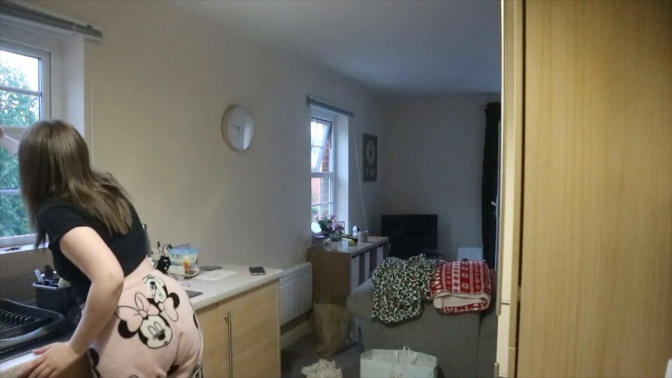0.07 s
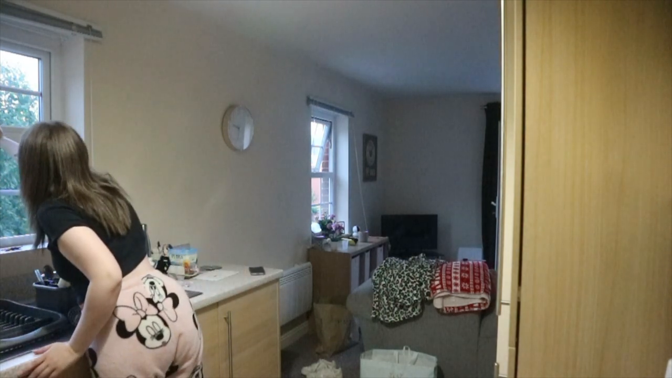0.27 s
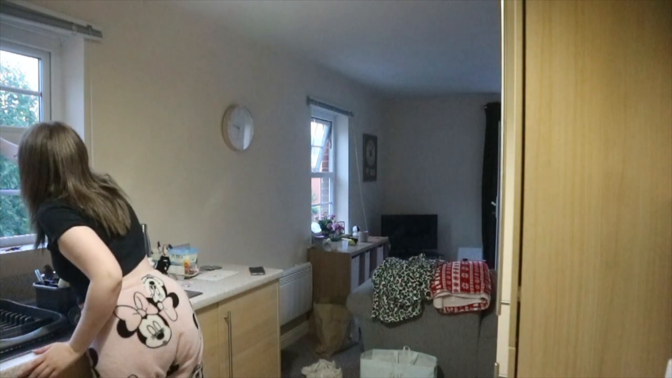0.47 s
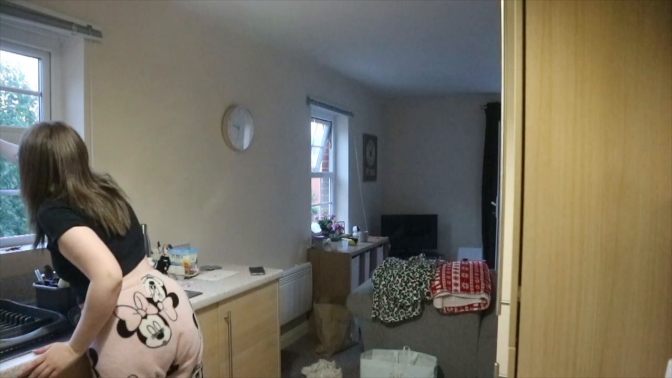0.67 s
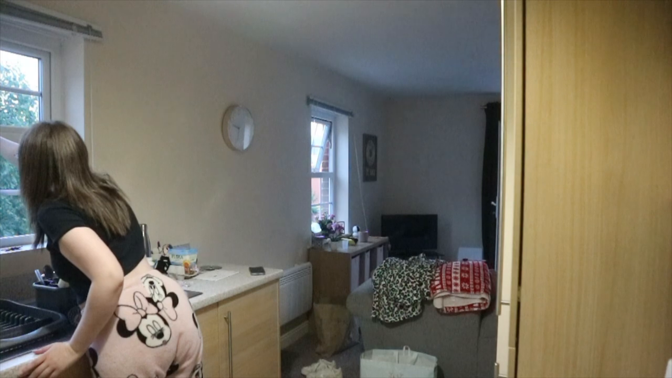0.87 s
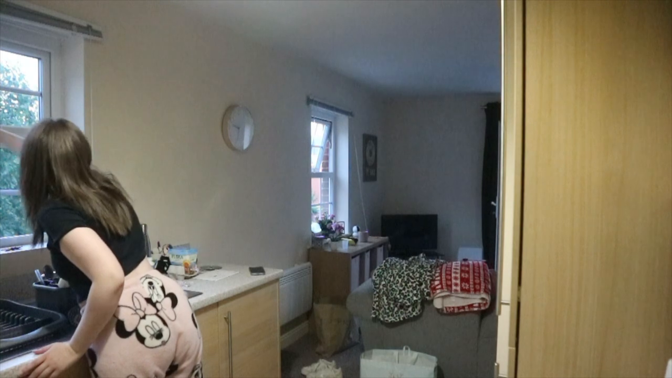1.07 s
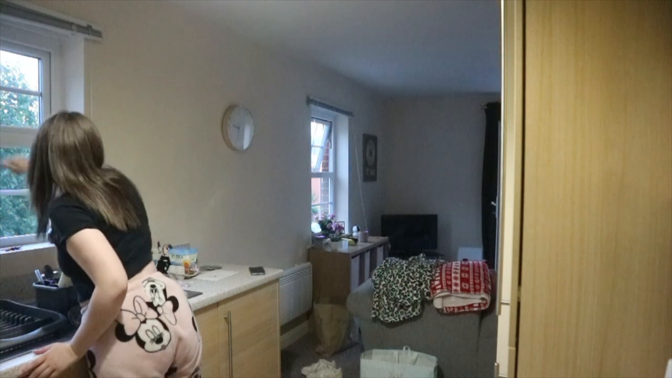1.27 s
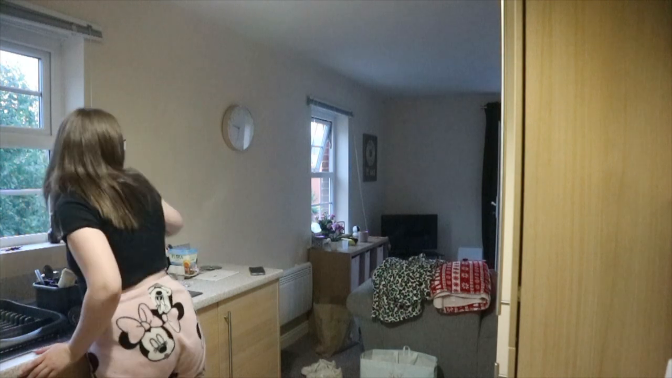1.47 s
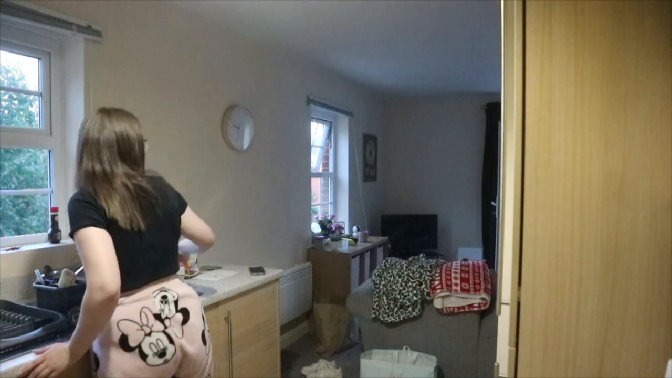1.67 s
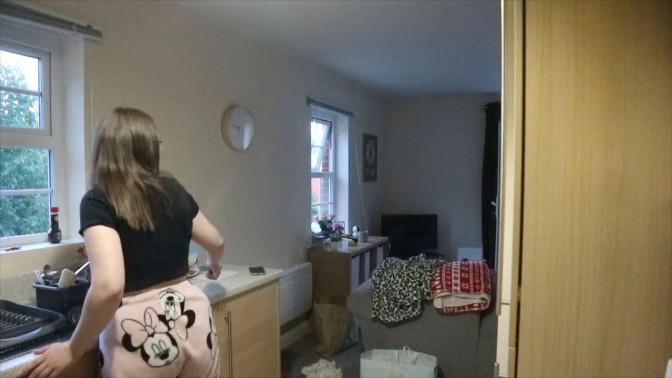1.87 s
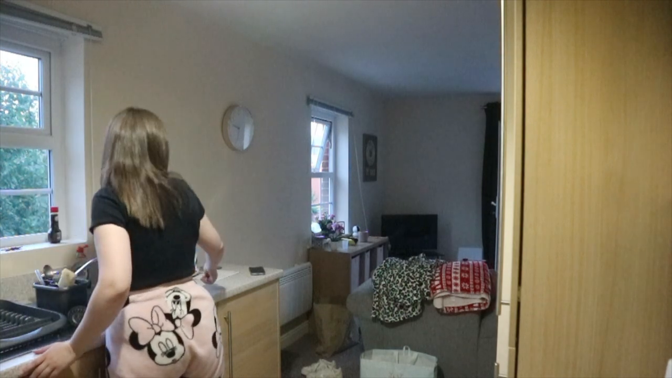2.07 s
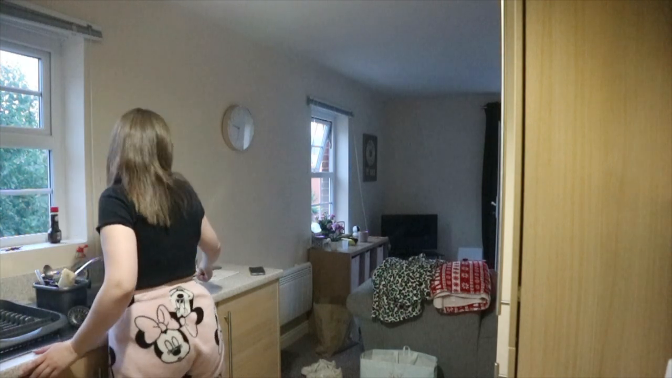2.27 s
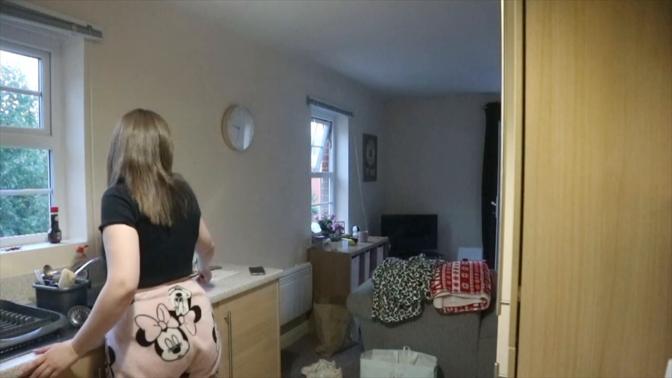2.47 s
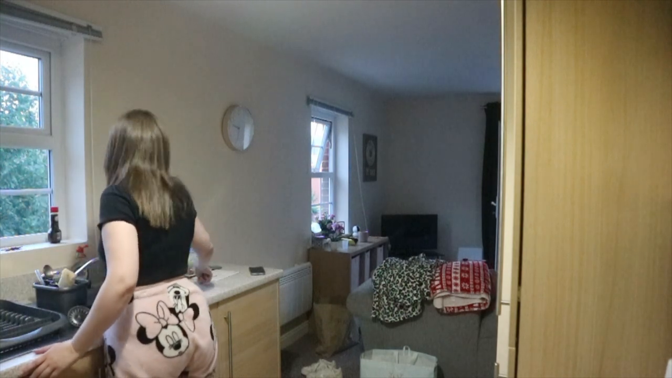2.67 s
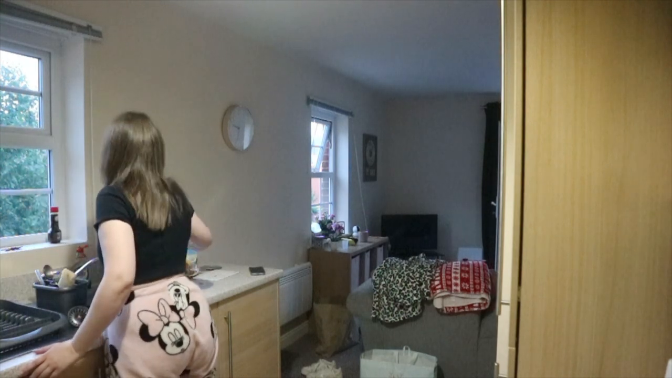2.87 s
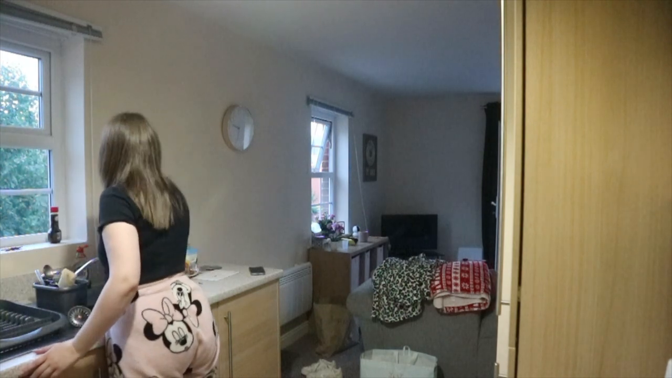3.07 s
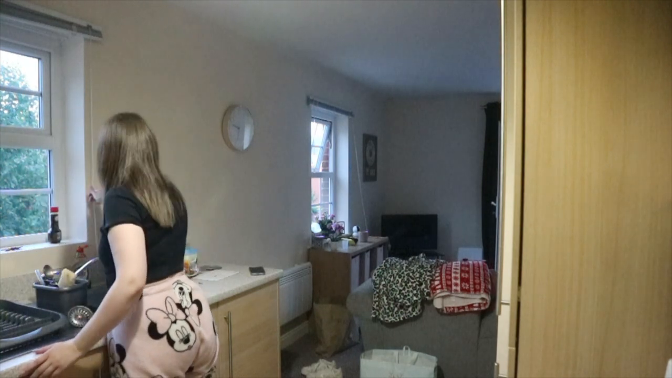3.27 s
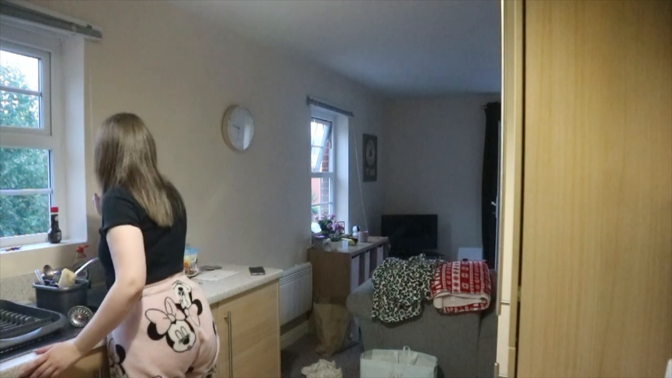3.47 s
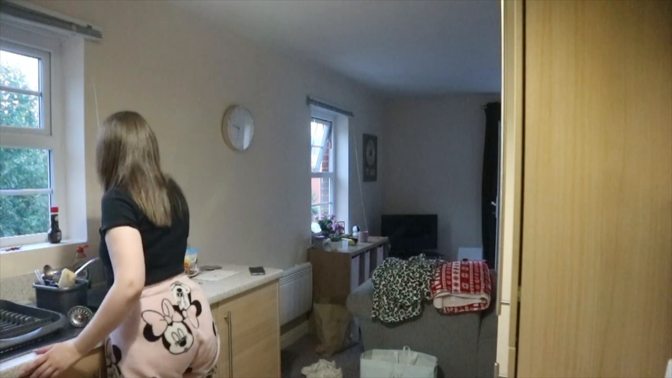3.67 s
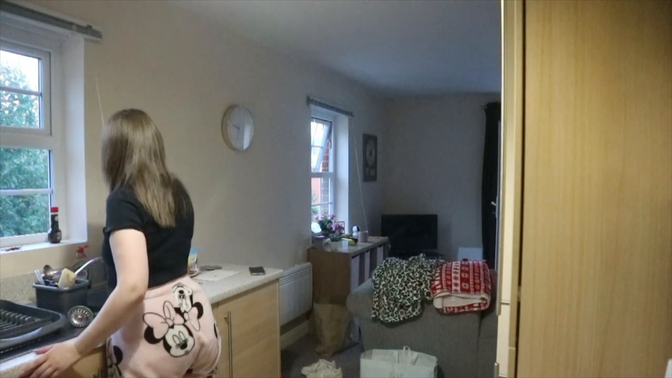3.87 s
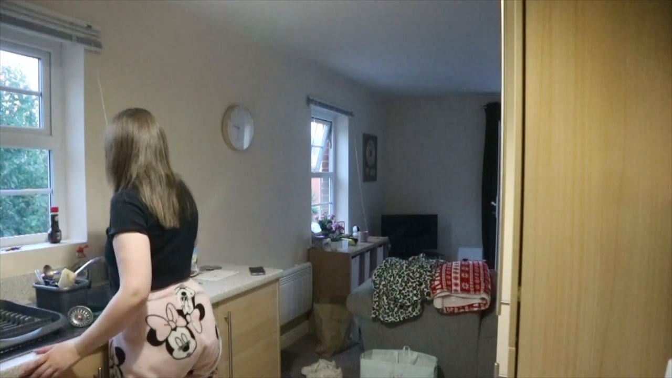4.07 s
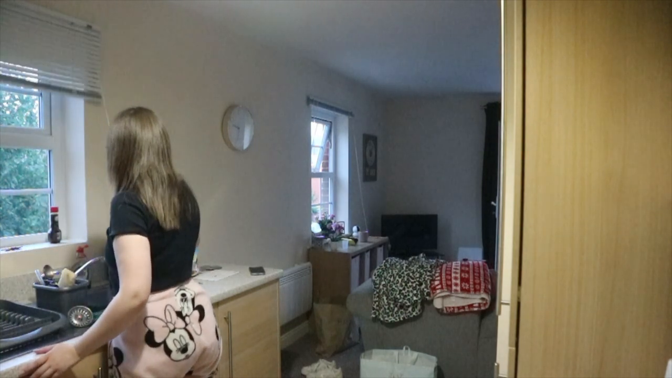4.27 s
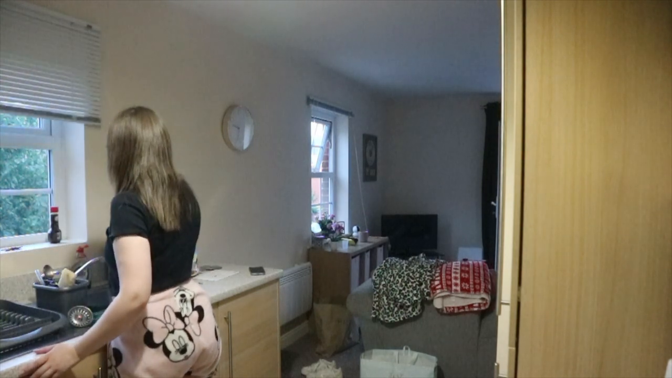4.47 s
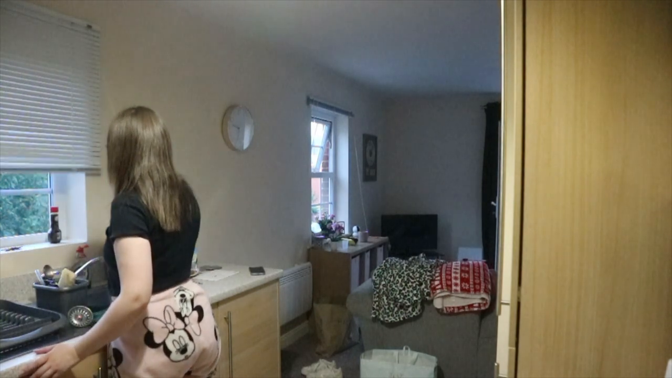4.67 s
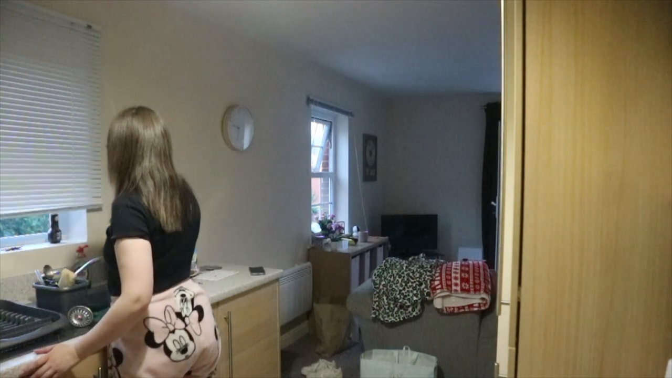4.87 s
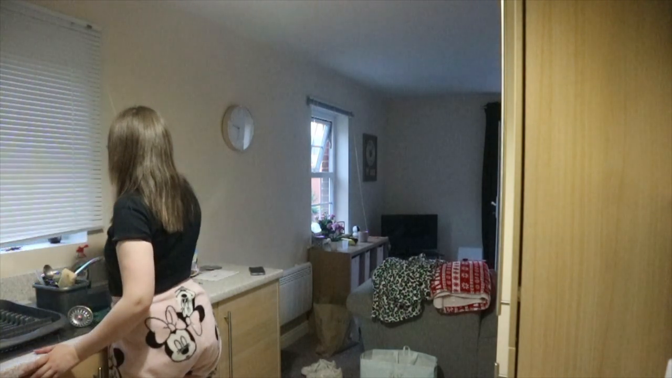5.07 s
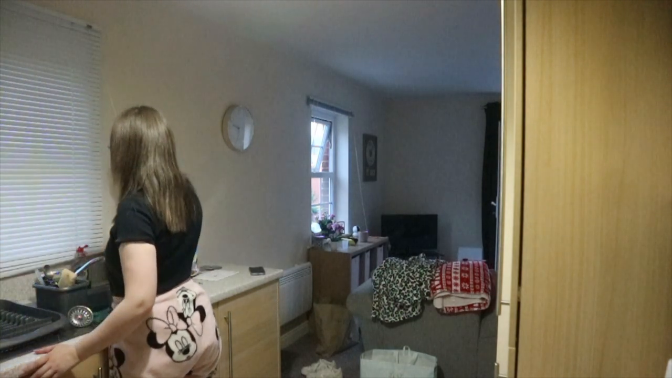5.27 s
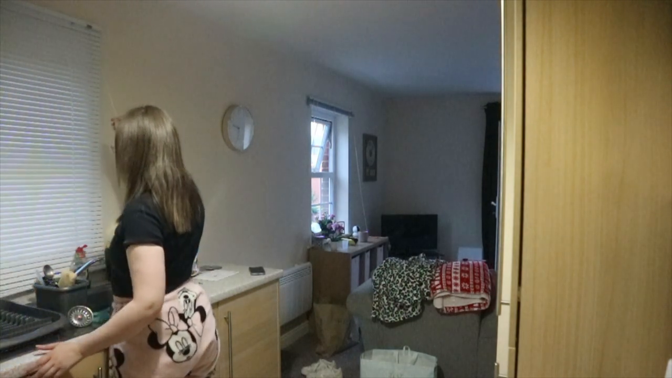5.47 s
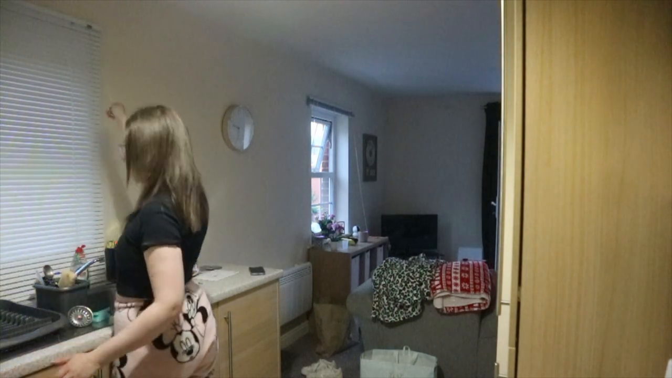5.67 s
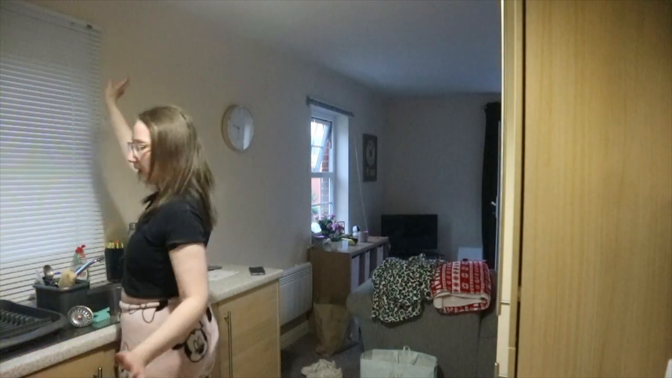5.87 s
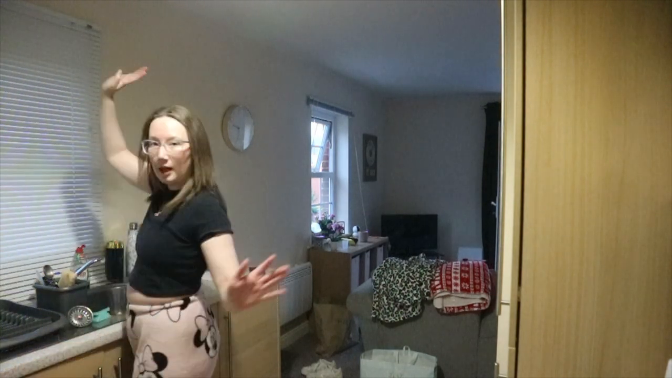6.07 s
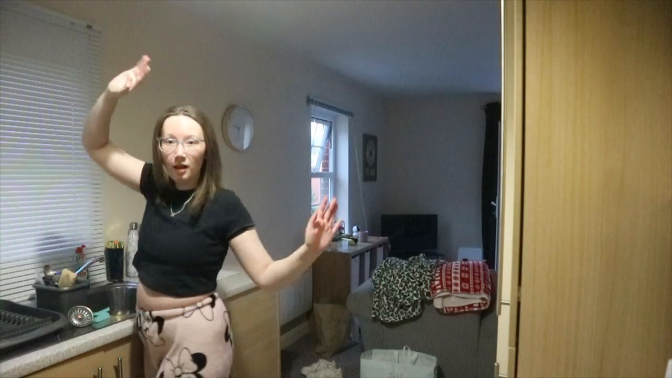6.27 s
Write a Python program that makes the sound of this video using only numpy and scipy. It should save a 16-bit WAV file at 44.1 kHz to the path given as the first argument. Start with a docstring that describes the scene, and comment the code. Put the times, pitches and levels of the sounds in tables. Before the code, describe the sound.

Quiet sash rubs and latch clicks, gritty key taps, then a metallic whirr of cord and slats, a piled clatter, and one late rail knock.

```python
"""Soft thumps and clicks open the scene as a kitchen window is pulled shut; then small keys are picked up
from the worktop and a venetian blind runs down. Its cord rasps through the head rail, the slats clatter
onto the sill and the released cord knocks the rail, over a low rumble and murmur, heard by two close ports.
Friction is random contact grains through resonances, blows are decaying noise and damped sines,
and the rumble is shaped noise."""
import sys
import numpy as np
from scipy import signal
from scipy.fft import rfft, irfft, next_fast_len
from scipy.io import wavfile
from scipy.ndimage import uniform_filter1d

SR = 44100
rng = np.random.default_rng(int(sys.argv[2]) if len(sys.argv) > 2 else 0)


def output_pcm(signal):
    """Save a mono or channel-first signal as 16-bit PCM at the path in sys.argv[1].

    Samples are clipped to [-1, 1] before scaling.
    """
    pcm = np.clip(np.atleast_2d(signal).T, -1, 1) * 32767
    wavfile.write(sys.argv[1], SR, np.round(pcm).astype(np.int16))


N = 278976   # samples


def head_rail():
    """Stick-slip friction: the cord catches densely on the lock and rings the sheet-metal rail and the pane."""
    # blows on the rail: (time [s], relative peak level [dB], ring frequency [Hz])
    rail_knocks = [(3.362, -54, 4400), (3.396, -44.5, 2150), (3.4992, -30, 2740), (3.5, -36.5, 1390),
                   (3.502, -44, 4200), (3.526, -27, 2770), (3.5985, -36, 1360), (3.617, -37, 2550),
                   (3.649, -40, 1400), (3.66, -37.5, 2200), (3.735, -36, 2960), (3.779, -35.5, 1480),
                   (3.8465, -32, 5350), (3.844, -17.5, 4460), (3.845, -17, 3260), (3.846, -21.5, 1930),
                   (3.847, -18.5, 4160), (3.8455, -21, 1540), (3.849, -48, 2820), (4.058, -46, 2160),
                   (4.131, -16.5, 2770), (4.1601, -14, 3700), (5.294, -18.5, 1560), (6.106, -17, 1520),
                   (6.114, -9.5, 1580), (6.109, -25.5, 1142), (6.113, -57, 585), (6.118, -13, 2050),
                   (6.1314, -35, 3070), (6.16, -30, 650)]
    # slats flick against each other as the stack opens: (time [s], relative peak level [dB], ring frequency [Hz])
    slat_flicks = [(4.1726, -5, 3220), (4.1896, -12, 3170), (4.2125, -3.5, 3040), (4.2294, -4.5, 2950),
                   (4.2687, -4, 3130), (4.3011, -3.5, 2790), (4.3386, -22, 2750), (4.3742, -13, 2760),
                   (4.506, -16, 3200), (4.535, -19, 3220), (4.554, -8, 3340), (4.5774, -12, 3520),
                   (4.6232, -3, 2850), (4.6464, -14, 2630), (4.6777, -9, 3200), (4.696, -7, 2760),
                   (4.7194, -15, 2320), (4.7483, -5.5, 4400), (4.784, -14, 2780), (4.822, -19, 3070),
                   (4.86, -11, 3050), (4.8915, -16, 4340), (4.9599, -6, 3084), (4.9825, -16, 3110),
                   (5.0364, -23, 2870), (5.0783, -23, 2860), (5.1404, -21, 3040), (5.1894, -10, 3000),
                   (5.24, -12, 2920), (5.288, -14, 2880), (5.3292, -22, 3100)]
    # spectrum of the rasp: (frequency [Hz], relative density [dB per Hz])
    rasp_colour = [(90, -59), (150, -30), (620, -21), (1030, -19), (1380, -8.5), (1900, -7.5), (2970, -5),
                   (3650, -7.5), (4400, -12), (7850, -19), (11000, -28), (15500, -30)]
    # a fainter tone above the rail's lowest mode: (frequency [Hz], width [Hz], relative level [dB])
    upper_modes = [(4460, 160, 0), (4250, 140, -3)]

    rasp, jerks_db = cord_rasp()
    effort = rasp / (rasp + amp(-42.5))   # a slack cord hardly rings the rail
    broad = unit_gain(lambda x: colour(x, rasp_colour))
    catches = grains(3000 * amp(4 * drift(25)), spread_db=2.8)   # slips come in clumps

    slips = broad(amp(-3) * rasp * catches + amp(-11) * bursts(rail_knocks, decay_s=.003))
    slips = patchy(slips + broad(amp(-22) * bursts(slat_flicks, decay_s=0.012)))
    slips = brightened(rail_ring(slips, effort), rasp)
    knocks = pings(rail_knocks, cycles=7.1, gain_db=-3.5)
    flicks = pings(slat_flicks, cycles=13.7, gain_db=-9)
    singing = singing_rail(jerks_db)
    pane = pane_boom(rasp, catches)

    upper = rms_one(resonate(resonate(catches, upper_modes), upper_modes))
    upper = amp(-19 + 5.8 * drift(23)) * effort * rasp * upper
    # slats tick as the ladder strings pull them
    ticks = amp(-16) * effort * rasp * broad(grains(400, spread_db=5.5))
    near = upper + ticks + amp(-5.5) * knocks
    echoing = slips + knocks + flicks + amp(-13) * singing + amp(-8) * near
    return echoing, pane + amp(-5.5) * singing + near


def cord_rasp():
    """Friction envelope: the rasp gain follows the cord's strokes, and jerks add straight decays in dB."""
    # cord taken up slack, running, then dangling: strokes of (time [s], relative rasp level [dB])
    strokes = [
        [(3.3, -68), (3.39, -59.5), (3.476, -52), (3.572, -56.5), (3.7, -54.5), (3.836, -40.5), (3.904, -65),
         (4.02, -49)],
        [(4.03, -51.5), (4.062, -34), (4.08, -35), (4.182, -25.5), (4.37, -21.5), (4.472, -34), (4.5, -28.5),
         (4.564, -22.5), (4.63, -22), (4.7, -22), (4.838, -22.5), (4.95, -27.5), (4.98, -24.5), (5.115, -28.5),
         (5.135, -25.5), (5.36, -24), (5.4, -33.5)],
        [(5.8, -60), (5.95, -62), (6.05, -55), (6.11, -54)],
    ]
    # the cord jerks or swings against the rail: (time [s], relative rasp level [dB], held [s])
    cord_jerks = [(3.5, -40, 0.0037), (3.526, -44.5, 0.004), (3.845, -33.5, 0.0014), (6.107, -29, 0.0044),
                  (6.112, -23, 0.02), (6.15, -39.5, 0.015)]
    jerks_db = swells(cord_jerks[:-1], rise_db_s=8000, fall_db_s=515)
    swing_db = swells(cord_jerks[-1:], rise_db_s=8000, fall_db_s=88)   # the last one dies more slowly
    jerks_db = np.maximum(jerks_db, swing_db)
    return gains(strokes)[0] + amp(jerks_db), jerks_db


def rail_ring(slips, effort):
    """Modal resonance: the cord wanders over the lock, so each mode is driven now more, now less."""
    # upper rail resonances: (frequency [Hz], width [Hz], relative level [dB])
    rail_modes = [(2220, 250, -9), (3120, 63, -18), (2944, 50, 2), (3054, 41, 0), (2717, 51, -5),
                  (3230, 24, 5), (4260, 67, -14), (4470, 52, -9), (4365, 157, 3.5), (4970, 20, -6),
                  (5890, 110, 0)]
    ringing = 0
    for mode in rail_modes:
        drive = amp(3.5 * drift(16) - 1)
        ringing = ringing + resonate(drive * effort * slips, [mode])
    return slips + ringing


def brightened(slips, rasp):
    """Level-dependent spectrum: treble opens by 2 dB per dB of rasp, up to +3 dB from -22 dB on."""
    rasp_db = 20 * np.log10(rasp)
    treble_db = np.minimum(2 * (rasp_db + 22), 0) + 3
    treble = signal.lfilter(*signal.butter(1, 4500, "high", fs=SR), slips)
    return slips + (amp(treble_db) - 1) * treble


def singing_rail(jerks_db):
    """Narrow-band resonance: grains excite the lowest rail mode, which wavers in pitch and breaks off."""
    # sounds once as the sash moves, then under the cord: (time [s], relative level [dB], held [s])
    sung = [(0.15, -58, 0.004), (4.064, -47, .12), (4.212, -23, 0.1), (4.346, -14.5, 0.035),
            (4.45, -30, 0.13), (4.57, -25, 0.053), (4.665, -18.5, 0.084), (4.735, -14, 0.071),
            (4.84, -23, 0.13), (4.95, -17.5, 0.02), (5.02, -27, 0.089), (5.11, -23.5, 0.07),
            (5.22, -18.5, 0.037), (5.295, -12, 0.032), (6.15, -31, 0.07), (6.28, -38, 0.0054)]
    # resonances near the lowest mode: (frequency [Hz], width [Hz], relative level [dB])
    tone_modes = [(1568, 30.3, 16), (1530, 46, 8), (1520, 41, -16)]
    tone = amp(swells(sung, rise_db_s=704, fall_db_s=293)) + amp(jerks_db)   # a jerk also sounds the tone
    singing = resonate(resonate(grains(400, spread_db=5.5), tone_modes), [(1476, 65, 0)])
    waver = np.cumsum(1 + .012 * drift(15.26))   # reading speed, hence pitch
    singing = np.interp(waver, np.arange(N), singing)
    firm = tone / (tone + amp(-42))
    breaks = amp((1.5 + 3 * (1 - firm)) * (drift(30) - .5))   # a faint tone breaks off more deeply
    return tone * breaks * evened(singing, share=.62)


def pane_boom(rasp, catches):
    """Plate vibration: the pane behind the blind booms on a wavering low mode and two broad upper ones."""
    # booms of the pane: (time [s], relative level [dB], held [s])
    booms = [(4.21, -40.5, 0.02), (4.334, -36, 0.026), (4.546, -43.5, 0.027), (4.7, -41, 0.13),
             (4.934, -47, 0.0078), (5.05, -53, 0.03), (6.18, -27, 0.022), (6.27, -42, 0.047)]
    # upper mode, following the rasp: (frequency [Hz], width [Hz], relative level [dB])
    upper_mode = [(628, 240, 0)]
    # second mode, only while the cord runs: (frequency [Hz], width [Hz], relative level [dB])
    second_mode = [(314, 320, 0)]
    boom = amp(swells(booms, rise_db_s=357, fall_db_s=296))
    phase = 2 * np.pi * 204 / SR * np.cumsum(1 + 0.034 * drift(21))   # about 204 Hz
    lowest = boom * np.sqrt(2) * np.sin(phase)

    growth_db = 9 * np.arange(N) / SR   # the hum grows as the blind lengthens
    hum = rasp * amp(-62.5 + growth_db + 4.7 * drift(17))
    upper = hum * rms_one(resonate(resonate(catches, upper_mode), upper_mode))
    running = amp(swells(booms[:-2], rise_db_s=357, fall_db_s=296))
    second = running * rms_one(resonate(resonate(catches, second_mode), second_mode))
    return amp(-5.5) * lowest + amp(-4.5) * upper + amp(-2.5) * second


def patchy(x):
    """Band-wise modulation: neighbouring thirds of an octave swell and sink independently."""
    edges = 1700 * 2 ** np.arange(0, 2.4, 1 / 3)
    out = x
    for low, high in zip(edges, edges[1:]):
        out = out + (amp(3.3 * (drift(30) - 0.19)) - 1) * band(x, low, high)
    return out


def slats():
    """Impact and modal ringing: light slats clatter densely; the bottom bar lands in blows that thud on the sill."""
    # slats piling up in heaps: (time [s], relative low level [dB], relative high level [dB], held [s])
    pile_heaps = [(5.358, -16.5, -10.5, 0.0078), (5.448, -11.5, -7.5, 0.0053), (5.506, -16.5, -19, 0.044),
                  (5.566, -18, -13, 0.018), (5.644, -14.5, -16.5, 0.011), (5.679, -37, -22.5, 0.01)]
    # blows: (time [s], relative peak level [dB], ring frequency [Hz], relative sill thud level [dB])
    landings = [(5.359, -7.5, 650, -30), (5.364, -15.5, 607, -22), (5.367, -6, 1760, -23),
                (5.377, -13.5, 638, -24), (5.384, -15.5, 1590, -34), (5.45, -24, 2590, -35),
                (5.453, -21, 660, -32), (5.464, -11, 3140, -27), (5.51, -13, 1450, -34),
                (5.56, -6.5, 1224, -4.5), (5.571, -7, 2530, -7.5), (5.576, -7.5, 1560, -32),
                (5.583, -11.5, 1570, -39), (5.612, -11.5, 1490, -36.5), (5.643, -12, 970, -0.5),
                (5.648, -9.5, 1190, -19), (5.655, -16, 737, -18), (5.664, -6.5, 1130, -10.5),
                (5.699, -13, 1170, -10.5)]
    # slat modes: (frequency [Hz], relative level [dB], decay time T60 before capping [s])
    slat_modes = [(620, -6, 0.045), (860, -13, .07), (1182, -1.5, 0.099), (1370, -4, 0.62),
                  (1338, -7, 0.066), (1585, -5.5, 0.17), (1990, -4, 5.0), (2390, -13, 0.15),
                  (2310, -12, 0.12), (2540, -9.5, 0.18), (2872, -0.5, .1), (3700, -21, 0.23)]
    # clatter spectrum: (frequency [Hz], relative density [dB per Hz])
    pile_colour = [(200, -14.5), (420, -10.5), (635, -2), (1570, 5), (2470, -4.5), (3520, -15.5),
                   (9400, -38), (15500, -62)]
    # boom of the sill: (time [s], level [dB], held [s])
    sill_boom = (5.37, -41, 0.16)

    low_heaps = [(s, db, held) for s, db, _, held in pile_heaps]
    high_heaps = [(s, db, held) for s, _, db, held in pile_heaps]
    low = amp(swells(low_heaps, rise_db_s=1500, fall_db_s=444))
    high = amp(swells(high_heaps[:-1], rise_db_s=1500, fall_db_s=444))
    high = high + amp(swells(high_heaps[-1:], rise_db_s=1500, fall_db_s=175))   # the last heap settles slowly
    body = unit_gain(lambda x: colour(x, pile_colour))
    clatter = body(grains(2500 * amp(3 * drift(9.3)), spread_db=2.5))
    pile = low * rms_one(band(clatter, 180, 1960)) + high * rms_one(band(clatter, 2600, 13000))

    ring = 0
    for mode in damped(slat_modes, longest_s=.03):
        # every blow strikes each mode with a strength of its own
        struck = [(s, db + rng.normal(0, 3)) for s, db, *_ in landings]
        ring = ring + resonate(bursts(struck, decay_s=.004), [mode])
    blows = amp(-9) * body(bursts(landings, decay_s=.006))
    near = pings(landings, cycles=8.7, gain_db=-6)
    thuds = pings([(s, db + thud_db, 352) for s, db, hz, thud_db in landings], cycles=4.2, gain_db=-8.5)
    boom = amp(swells([sill_boom], rise_db_s=1204, fall_db_s=68))
    sill = boom * evened(resonate(rng.standard_normal(N), [(114.7, 5.3, 0)]), share=0.23)
    return amp(-7) * pile + blows + amp(8) * ring, sill + amp(-10.5) * blows + near + thuds


def window():
    """Friction and impact: the sash rubs, latch and frame click; seal thumps stay apart from the echoing part."""
    # sash rubbing in its frame: (time [s], relative level [dB], held [s])
    sash_rubs = [(0.208, -65, .005), (0.308, -47, 0.12), (0.395, -45, 0.0087), (0.415, -44, .005),
                 (0.696, -53, 0.046), (0.776, -45, 0.039), (1.02, -45.5, 0.017), (1.17, -59, 0.25),
                 (1.398, -52.5, 0.033), (2.36, -50.5, 0.067)]
    # rub spectrum: (frequency [Hz], relative density [dB per Hz])
    sash_colour = [(530, -4.5), (900, -9), (2520, -6), (4210, -8.5), (6950, -27), (7400, -21.5),
                   (9600, -28), (15500, -32)]
    # sash on its seal: (time [s], relative peak level [dB], frequency [Hz])
    seal_thumps = [(0.313, -24.5, 60.6), (0.393, -22.5, 66.6), (0.411, -33, 69), (0.44, -32, 53.8),
                   (0.804, -26.5, 60.5), (0.847, -32, 45.6), (0.881, -52, 65), (1.02, -29.5, 61.6),
                   (1.049, -22.5, 68)]
    # latch clicks: (time [s], relative peak level [dB], ring frequency [Hz])
    latch_clicks = [(0.2084, -40, 3550), (0.3042, -35, 4360), (0.41, -32.5, 2040), (0.6948, -66, 1890),
                    (0.7677, -33.5, 3170), (0.829, -46, 2430), (0.9971, -42.5, 2350), (1.0345, -38, 3850),
                    (1.0705, -27, 2540), (1.079, -44, 2630), (1.088, -55, 2460), (1.104, -39, 2800),
                    (1.118, -54, 2710), (1.3992, -39, 2180), (1.401, -46, 4380), (1.4455, -41, 2300)]
    # sash frame modes: (frequency [Hz], relative level [dB], decay time T60 before capping [s])
    frame_modes = [(1078, 3, 0.12), (1286, -6, 0.07), (1770, -11, 0.077), (1906, 2, 0.075),
                   (1960, -1.5, 0.074), (2420, -12, .2)]
    # the frame creaks as the sash binds: (time [s], level [dB], held [s])
    frame_squeak = (0.701, -56.5, 0.066)

    frame = unit_gain(lambda x: colour(x, sash_colour))
    ring = unit_gain(lambda x: resonate(x, damped(frame_modes, longest_s=0.15)))
    rub = amp(swells(sash_rubs, rise_db_s=1500, fall_db_s=191.5)) * grains(2500, spread_db=3.5)
    rubs = frame(amp(-10) * rub + amp(-11) * bursts(latch_clicks, decay_s=0.0074))
    creak = amp(swells([frame_squeak], rise_db_s=900, fall_db_s=250)) * ring(grains(900, spread_db=8.5))
    clicks = pings(latch_clicks, cycles=14, gain_db=-8)
    puffs = amp(5.5) * band(bursts(seal_thumps, decay_s=0.03), 140, 235)   # air squeezed out of the seal
    return rubs + clicks + creak, pings(seal_thumps, cycles=1.34, gain_db=-2) + puffs


def keys():
    """Friction, impact and resonance: gritty drag, taps on the worktop and thin high modes of the keys."""
    # keys dragged over the worktop in short shoves: (time [s], relative level [dB], held [s])
    shoves = [(2.558, -35, 0.01), (2.6, -47.5, 0.09), (2.697, -31, 0.015), (2.745, -23.5, 0.0039),
              (2.805, -18.5, 0.0032), (2.82, -35, 0.026)]
    # taps: (time [s], relative peak level [dB], ring frequency [Hz])
    key_taps = [(2.558, -21.5, 2830), (2.571, -22.5, 2270), (2.694, -24, 2940), (2.747, -13.5, 2740),
                (2.769, -27, 3050), (2.807, -17, 3070), (2.839, -27.5, 2200), (2.864, -40, 2900)]
    # spectrum of drag and taps: (frequency [Hz], relative density [dB per Hz])
    key_colour = [(210, -58), (350, -29), (565, 0.5), (834, -11), (1500, -3.5), (2930, -1), (5250, -4),
                  (9000, -18), (12000, -34), (15500, -48)]
    # high modes: (frequency [Hz], width [Hz], relative level per pass [dB])
    key_modes = [(11747, 60, 10), (11700, 120, 2), (14440, 50, -1.5), (14750, 50, -1)]
    # keys knock together: (time [s], relative level [dB], held [s])
    key_jingles = [(2.7, -76, .02), (2.75, -54, 0.035), (2.808, -29.5, 0.0055)]

    drag = amp(swells(shoves, rise_db_s=3997.5, fall_db_s=266)) * grains(5000, spread_db=2.5)
    jingle = amp(swells(key_jingles, rise_db_s=1493, fall_db_s=455))
    ringing = rms_one(resonate(resonate(grains(590, spread_db=4), key_modes), key_modes))
    top = unit_gain(lambda x: colour(x, key_colour))
    contact = top(amp(-7.5) * drag + amp(-13.5) * bursts(key_taps, decay_s=0.0084))
    return contact + amp(9.5) * jingle * ringing + pings(key_taps, cycles=3.7, gain_db=3)


def scrapes():
    """Rough friction on sheet metal: sparse catches drive a few broad modes, each now more, now less."""
    # hinge stay and slack cord scrape faintly: (time [s], level [dB], held [s])
    faint_scrapes = [(0.97, -62, 0.025), (1.03, -65, 0.12), (1.17, -61.5, 0.082), (1.295, -61, 0.02),
                     (1.36, -63, 0.048), (3.495, -50, 0.036), (3.56, -54, 0.025), (3.62, -54, .05),
                     (3.705, -53, 0.19)]
    # scraped metal modes: (frequency [Hz], width [Hz], relative level [dB])
    scraped_modes = [(1300, 81, -9), (1510, 97, 4.5), (1540, 46, -3), (2720, 79, -25)]
    catches = grains(700, spread_db=2.5)
    rough = sum(resonate(amp(1.9 * drift(12)) * catches, [mode]) for mode in scraped_modes)
    return amp(swells(faint_scrapes, rise_db_s=696, fall_db_s=305)) * evened(rough, share=0.36)


def background():
    """Spectral shaping of noise, independent in sum and difference, at levels that follow a table."""
    # low background rumble and murmur, sinking after the keys:
    # (time [s], relative bass level [dB], relative murmur level [dB])
    background_levels = [(0.0, -53.5, -56), (1.02, -52, -56.5), (1.34, -57.5, -57.5), (2.48, -51.5, -54.5),
                         (3.08, -62, -57.5), (4.02, -54, -56.5), (4.4, -52, -48.5), (4.9, -56.5, -67),
                         (5.3, -63, -61), (5.85, -65, -59.5), (6.33, -61, -52.5)]
    # bass spectrum: (frequency [Hz], relative density [dB per Hz])
    rumble_colour = [(15, -43), (25, -45), (43, 7), (75, -3.5), (102, 5.5), (135, 3), (151, -29.5),
                     (182, -5.5), (240, -24), (310, -38), (530, -120)]
    # murmur spectrum: (frequency [Hz], relative density [dB per Hz])
    murmur_colour = [(88, -48), (150, -17.5), (244, -9), (326, -2.5), (359, -3.5), (381, -22), (420, -12.5),
                     (500, -14), (583, -8.5), (930, -21), (1660, -24), (2310, -28), (2500, -27),
                     (11800, -46), (15500, -64.5)]
    bass, murmur = gains([background_levels])
    white = rng.standard_normal((2, 2, N))
    rumble = amp(1.5) * bass * rms_one(colour(white[0], rumble_colour))
    return rumble + amp(2.5) * murmur * rms_one(colour(white[1], murmur_colour))


def room(x):
    """Reverberation: dense echoes die band by band; the direct sound is strong in the sum, weaker in the difference."""
    # reverberation time: (frequency [Hz], T60 [s])
    room_t60 = [(100, 1), (400, 0.37), (1000, 0.39), (4000, 0.3), (12000, 0.28)]
    t, tail = np.arange(SR // 2) / SR, 0
    edges = 60 * 2 ** np.arange(9.0)   # octaves
    for low, high in zip(edges, np.minimum(edges * 2, .45 * SR)):
        echoes = band(rng.standard_normal((2, len(t))), low, high)
        tail = tail + echoes * amp(-60 * t / at_hz(room_t60, low * 1.4))
    tail *= np.minimum(t / 0.0011, 1)   # echoes build up over 1.1 ms
    tail /= np.sqrt(np.sum(tail ** 2, axis=1, keepdims=True))
    tail[0] *= amp(0.5)
    tail[:, 0] += [1, .35]   # direct sound in sum and difference
    return signal.fftconvolve(x[None], tail, axes=1)[:, :N]


def amp(db):
    """Logarithmic level: decibels to amplitude gain."""
    return 10 ** (np.asarray(db) / 20)


def rms_one(x):
    """Power normalisation: scale to rms 1."""
    return x / np.sqrt(np.mean(x ** 2) + 1e-20)


def gains(tables):
    """Amplitude envelope: level columns interpolated in dB, silent outside the strokes."""
    out = np.full((len(tables[0][0]) - 1, N), 1e-10)
    for rows in tables:
        s, *columns = np.transpose(rows)
        at = np.arange(round(s[0] * SR), min(round(s[-1] * SR), N))
        out[:, at] = [amp(np.interp(at / SR, s, c)) for c in columns]
    return out


def swells(rows, rise_db_s, fall_db_s):
    """Exponential growth and decay: level in dB rises straight, holds and falls straight; the loudest leads."""
    t = np.arange(N) / SR
    levels = []
    for s, db, held in rows:
        before, after = np.maximum(s - t, 0), np.maximum(t - s - held, 0)
        levels.append(db - rise_db_s * before - fall_db_s * after)
    return np.max(levels, axis=0)


def drift(per_s):
    """Interpolated noise: random knots of rms 1, 40 a second, joined by straight lines."""
    knots = rng.standard_normal(int(40 * N / SR))
    r = np.exp(-2 * np.pi * per_s / 40)   # likeness of neighbouring knots
    knots = rms_one(signal.lfilter([1], [1, -r], knots))
    return np.interp(np.linspace(0, len(knots) - 1, N), np.arange(len(knots)), knots)


def grains(per_s, spread_db):
    """Poisson-like shot noise: random tiny contacts of uneven size and either sign, at rms 1."""
    born, size, sign = rng.random((3, N), np.float32)
    at, out = born < per_s / SR, np.zeros(N)
    size_db = spread_db * np.minimum(-np.log(1 - size[at]), 5)
    out[at] = amp(size_db) * np.sign(sign[at] - .5)
    return rms_one(out)


def bursts(events, decay_s):
    """Broadband impact: each blow is a noise burst with an exponential decay."""
    out, t = np.full(N + SR, 1e-18), np.arange(SR // 10) / SR
    for s, level_db, *_ in events:
        out[round(s * SR):][:len(t)] += amp(level_db) * np.exp(-t / decay_s) * rng.standard_normal(len(t))
    return out[:N]


def pings(events, cycles, gain_db):
    """Damped oscillation: each event swings at its own pitch, building up over about half a cycle."""
    out = np.zeros(N)
    for s, level_db, hz, *_ in events:
        i = round(s * SR)
        turns = hz * np.arange(min(N - i, SR // 4)) / SR
        envelope = np.exp(-turns / cycles) * (1 - np.exp(-2 * turns))
        out[i:i + len(turns)] += amp(level_db + gain_db) * np.sin(2 * np.pi * turns) * envelope
    return out


def resonate(x, modes):
    """Modal superposition: parallel two-pole resonances of (Hz, width in Hz, dB), signs alternating."""
    out = 0
    for k, (hz, width, level_db) in enumerate(modes):
        r = np.exp(-np.pi * width / SR)
        a = [1, -2 * r * np.cos(2 * np.pi * hz / SR), r * r]
        gain = (-1) ** k * amp(level_db) * (1 - r * r) / 2
        out = out + gain * signal.lfilter([1, 0, -1], a, x + 1e-18)
    return out


def damped(modes, longest_s):
    """Decay-bandwidth relation: (Hz, dB, T60) modes, T60 capped, become (Hz, width, dB) resonances."""
    return [(hz, np.log(1000) / np.pi / min(t60, longest_s), level_db) for hz, level_db, t60 in modes]


def evened(x, share):
    """Envelope compression: flatten part of the swell of a narrow tone."""
    swell = np.sqrt(uniform_filter1d(x ** 2, SR // 100) + 1e-12)
    return rms_one(x / swell ** np.clip(share, 0, 1))


def at_hz(points, hz):
    """Logarithmic frequency scale: interpolate a table along it."""
    table = np.array(points)
    return np.interp(np.log(hz + 1), np.log(table[:, 0]), table[:, 1])


def colour(x, spectrum, turn=1):
    """Linear filtering in frequency: weight by a dB spectrum; turn rotates the phase."""
    n = x.shape[-1]
    size = next_fast_len(n)
    weight = amp(at_hz(spectrum, np.fft.rfftfreq(size, 1 / SR)))
    return irfft(rfft(x, size) * turn * weight, size)[..., :n]


def band(x, low_hz, high_hz):
    """Band-pass filtering with Butterworth slopes."""
    return signal.sosfilt(signal.butter(2, [low_hz, high_hz], "band", fs=SR, output="sos"), x)


def unit_gain(shape):
    """Impulse-response energy: scale a filter so that unit white noise leaves it at rms 1."""
    scale = np.sqrt(np.sum(shape(signal.unit_impulse(2 ** 14, "mid")) ** 2))
    return lambda x: shape(x) / scale


def scene():
    """Sum and difference stereophony: the two ports' common and opposed parts become left and right."""
    # tone of the common part, darker above 9 kHz: (frequency [Hz], gain [dB])
    common_tone = [(20, -30.5), (40, 1), (9000, -1), (9600, -3.5), (10500, -5), (11750, -13),
                   (15500, -30.5)]
    # tone of the opposed part: (frequency [Hz], gain [dB])
    opposed_tone = [(25, -45), (60, -45), (110, -25), (200, -21), (380, -13.5), (700, -13), (1290, -9),
                    (2380, -14.5), (4400, -0.5), (8120, 3.5), (11000, 8), (15500, 9)]
    rail, tones = head_rail()
    clatter, sill = slats()
    rubs, thumps = window()
    # thumps, thuds and tones reach the two ports nearly alike
    alike = (thumps + tones + sill) * amp([[0], [-28]])
    total, apart = room(rubs + scrapes() + keys() + rail + clatter) + background() + alike
    # thin whine, opposed in the two ports
    whine = amp(-64.5) * rms_one(resonate(rng.standard_normal(N), [(2710, 12, 0)]))
    total = colour(total, common_tone)
    apart = colour(apart, opposed_tone, turn=1j) + whine   # a pressure difference leads by a quarter cycle
    # steady hiss of the room in the common part; self-noise of the capsules in the opposed part
    total += amp(-79) * band(rng.standard_normal(N), 880, 5000)
    apart += amp(-73.5) * band(rng.standard_normal(N), 3000, 14000)
    return np.array([total + apart, total - apart])


def record(dry):
    """Low-pass filtering: the top is cut by at least 70 dB from 16.1 kHz up."""
    return signal.sosfilt(signal.cheby2(12, 70, 16100, fs=SR, output="sos"), dry)


dry = scene()
out = record(dry)
output_pcm(out)
```